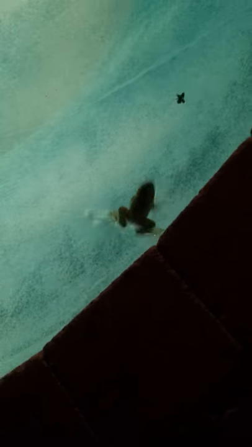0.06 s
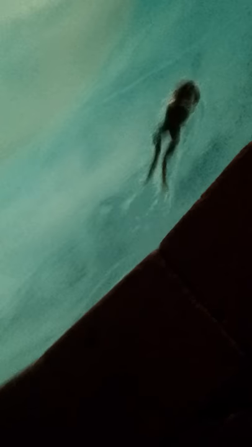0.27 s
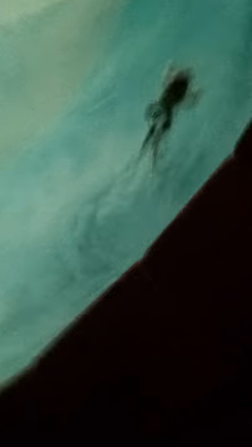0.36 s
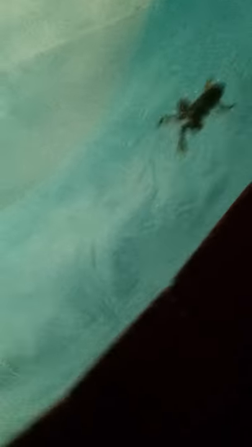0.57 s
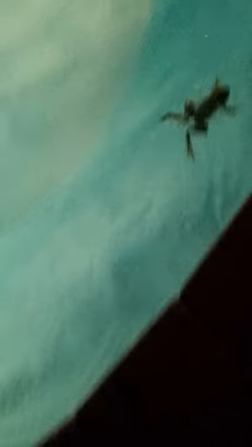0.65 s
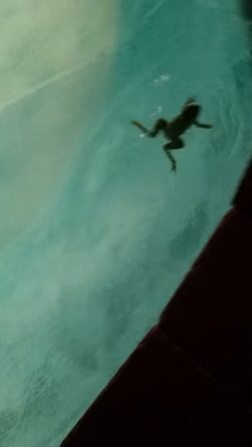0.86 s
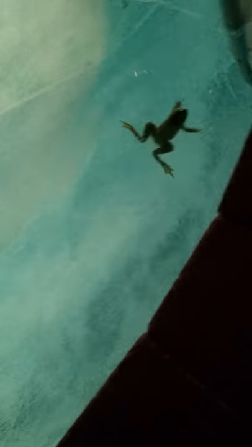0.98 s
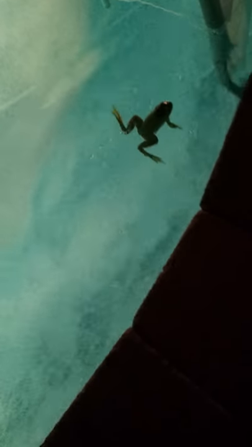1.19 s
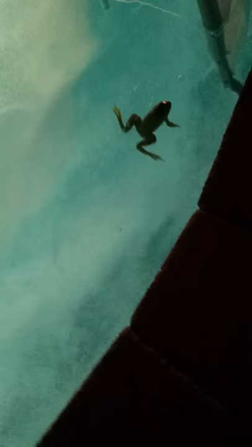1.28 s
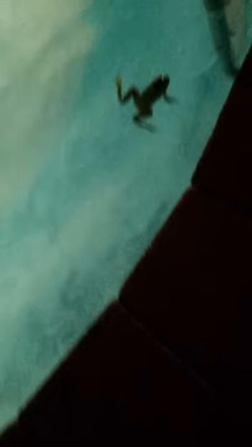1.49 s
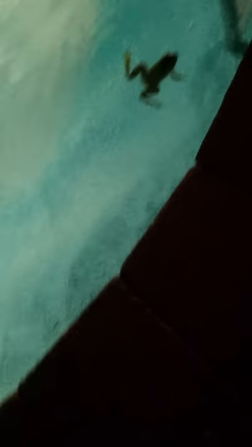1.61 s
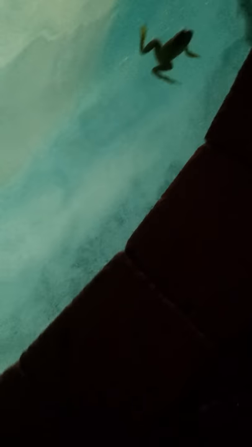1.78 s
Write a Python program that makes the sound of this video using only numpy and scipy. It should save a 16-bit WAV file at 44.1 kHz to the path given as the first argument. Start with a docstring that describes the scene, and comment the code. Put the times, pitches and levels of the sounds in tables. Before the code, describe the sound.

A frog makes one short, close splash in a backyard pool, from about 0.2 to 0.5 seconds. Spray patters and small bubbles ring upward in pitch, with a lower plop near 0.4 seconds and a few last drips. A quiet night hiss runs throughout. A faint distant drone grows after 1 second, and a very faint metallic tink comes near 1.5 seconds.

```python
"""A frog's splash at night

A frog kicks off across a backyard pool and makes one short splash, close by.
Trapped air bubbles ring and rise in pitch amid a patter of spray; one big bubble plops as the
water closes. Behind it are a quiet hiss, a fading hum, a distant low drone that grows,
a few faint swishes and one faint metallic tink."""
import sys
import numpy as np
from scipy import signal
from scipy.fft import rfft, irfft
from scipy.io import wavfile

SR = 44100
rng = np.random.default_rng(int(sys.argv[2]) if len(sys.argv) > 2 else 0)


def dump(signal):
    """Clip the signal to [-1, 1] and save it as 16-bit WAV at the path in sys.argv[1]."""
    limited = np.clip(np.atleast_2d(signal).T, -1, 1)
    pcm = np.round(limited * 32767).astype(np.int16)
    wavfile.write(sys.argv[1], SR, pcm)


N = 81585
T = np.arange(N) / SR
HZ = np.fft.rfftfreq(N, 1 / SR)

# Tone colour of the hiss: pitch_hz, level_db
HISS_COLOUR = [(20, -7), (50, -8.5), (92, 1.5), (120, -6.5), (160, -3), (210, 0), (260, 0), (310, -3),
               (380, -6.5), (600, -8.5), (1000, -12), (2200, -15), (2900, -17), (3600, -17), (4500, -15),
               (5150, -10), (5550, -13), (6100, -17.5), (11500, -19.5)]
# Loudness of the hum: time_s, level_db
HUM_LEVEL = [(0, -69), (.15, -66), (.6, -67), (1, -70), (1.85, -78.5)]
# Tone colour of the drone's noise: pitch_hz, level_db
DRONE_COLOUR = [(120, -28), (230, 3), (400, 1.5), (600, -1.5), (1000, -10.5), (2500, -12), (5000, -22.5)]
# Loudness of the drone: time_s, level_db
DRONE_LEVEL = [(0, -72), (.95, -70), (1.15, -60.5), (1.27, -59.5), (1.335, -55.5), (1.39, -60), (1.56, -60),
               (1.65, -56), (1.73, -59.5), (1.81, -56.5), (1.85, -59)]
# Faint swishes: peak_s, width_s, level_db, pitch_hz, width_hz
SWISHES = [(.083, 0.017, -54.5, 10000, 613), (.085, 0.021, -60.5, 7900, 2540),
           (.988, 0.012, -58.5, 9600, 2300), (1.008, 0.014, -61, 2000, 2500),
           (1.667, 0.022, -62.5, 1500, 1400)]
# How much water is thrown about: time_s, level_db
SPLASH_LEVEL = [(.1, -110), (.16, -60), (.195, -52), (.212, -39), (.222, -41), (.236, -35.5), (.257, -41.5),
                (.270, -45), (.276, -38), (.283, -41), (.292, -32.5), (.312, -45), (.331, -39.5),
                (.350, -43.5), (.366, -48.5), (.381, -44.5), (.392, -34.5), (.414, -48), (.432, -55.5),
                (.48, -57), (.53, -62), (.62, -120)]
# Tone colour of the droplets: pitch_hz, level_db
DROP_COLOUR = [(250, -24), (850, -23), (1250, -1), (2400, 4), (3800, 1.5), (5600, 1.5), (7500, -4.5),
               (10000, -7), (12000, -18)]
# Tone colour of the finest spray: pitch_hz, level_db
MIST_COLOUR = [(2500, -15), (5000, -4), (7500, 2), (10000, 1), (12000, -5)]
# Single air bubbles (ring_s is the time to fade by 60 dB):
# start_s, pitch_hz, level_db, ring_s, rise_octaves_per_s, snap_0_to_1
BUBBLES = [ (.1688, 2700, -49.5, 0.028, 80, .1), (0.195, 5100, -44, .018, 5, .1),
           (0.2076, 4000, -30, .005, 20, .1), (0.2131, 4530, -28, .004, 20, 0.56),
           (0.2132, 1320, -34, 0.013, 13, 0.2), (.2280, 2340, -25, 0.008, 10, 0.1),
           (0.2277, 1346, -29.5, 0.036, 11, 0.3), (.2291, 3870, -24.5, 0.0095, 20, 0),
           (.2382, 7330, -30, 0.013, 10, 0.1), (.2473, 6400, -36, .008, 10, .2),
           (0.2632, 7100, -27.5, 0.0074, 5, 0.6), (0.277, 4000, -30, 0.0049, 20, 1),
           (0.2805, 3140, -34, 0.032, 29, 0.2), (.2870, 3630, -27, 0.0026, 20, 0),
           (0.2906, 5550, -24, 0.0037, 20, 0.55), (0.3019, 3810, -21, 0.0082, 35, .03),
           (0.3119, 2300, -35.5, 0.024, 45, .1), (0.3232, 3805, -24, 0.015, 20, 0),
           (.3365, 590, -40.5, 0.12, 7.75, 0), (.3368, 958, -39, 0.074, 10, .1),
           (0.343, 5950, -31.5, 0.011, 13, .8), (.3450, 1100, -36.5, 0.021, 22, 0),
           (0.3473, 3680, -20, 0.018, 25, 0), (0.3507, 4230, -14.5, 0.0058, 12, 0),
           (0.3533, 3850, -23.5, 0.0083, 16, 0.05), (0.3715, 7800, -35, .006, 10, 0),
           (0.3738, 2200, -27.5, .013, 3, 0.17), (0.38, 7500, -34, 0.011, 15, .1),
           (.3870, 1980, -34, 0.027, 11, 0.8), (0.3861, 486.4, -31, 0.099, 9.5, 0.7),
           (.3870, 340, -40.5, 0.018, 11, 0), (0.3976, 5050, -27.5, 0.0033, 20, 0.8),
           (.4070, 5500, -31, 0.0078, 60, 0), (0.436, 5400, -40, 0.019, 5, .1),
           (.4451, 1920, -29, 0.0038, 10, 0.33), (0.453, 1610, -38.5, 0.059, 57, 0.1),
           (0.4679, 1080, -48.5, 0.069, 4.3, .05), (0.49, 998, -43.5, 0.038, 15, .05),
           (.5015, 2030, -46, .045, 55, 0.1), (0.5096, 6750, -28.5, 0.0019, 47, 0.16),
           (0.5371, 3030, -36.5, 0.014, 4.2, 1), (0.6342, 3940, -46.5, 0.0068, 10, .1),
           (0.7722, 10000, -47, 0.0093, 5, 0.2), (1.2238, 3600, -43, 0.0026, 10, .3)]
# Tone colour of the churned water: pitch_hz, level_db
GURGLE_COLOUR = [(120, -10), (280, -4.5), (550, -0.5), (1050, -1), (1600, -11), (3000, -23)]
# Loudness of the churned water: time_s, level_db
GURGLE_LEVEL = [(.2, -110), (.262, -64), (.277, -51), (.31, -54), (.345, -52), (.39, -50.5), (.42, -62),
                (.5, -68), (.62, -120)]
# The notes that ring in the metal: pitch_hz, relative_level_db, ring_s
METAL_NOTES = [(1757, -2, 0.28), (1820, -3, 0.042), (1373, -9, 0.19), (1596, -1, .06), (715, -4, 0.14),
               (593, -6, 0.063)]


def amp(db):
    """Turns decibels into a number to multiply by."""
    return 10 ** (np.asarray(db) / 20)


def unit(x):
    """Scales a sound to an average strength (rms) of 1."""
    return x / np.sqrt(np.mean(x ** 2) + 1e-20)


def level(points):
    """A loudness curve through (time_s, level_db) points."""
    return amp(np.interp(T, *np.transpose(points)))


def swell(peak_s, width_s):
    """A smooth rise and fall."""
    return np.exp(-.5 * ((T - peak_s) / width_s) ** 2)


def colour(x, points):
    """Shapes the lows and highs of a sound, at strength 1."""
    hz, db = np.transpose(points)
    gain = amp(np.interp(np.log(HZ + 1), np.log(hz), db))
    return unit(irfft(rfft(x) * gain, N))


def band(hz, width_hz):
    """Noise around one pitch; around 0 Hz it is a random wobble."""
    gain = np.exp(-.5 * ((HZ - hz) / width_hz) ** 2)
    return unit(irfft(rfft(rng.standard_normal(N)) * gain, N))


def add(mix, start_s, sound):
    """Mixes a sound in at its start time."""
    part = mix[max(round(start_s * SR), 0):][:len(sound)]
    part += sound[:len(part)]


def tone(hz, waver_hz, flutter):
    """A tone of unsteady pitch and strength."""
    cycles = np.cumsum(hz + waver_hz * band(0, 11)) / SR
    return unit((1 + flutter * band(0, 11)) * np.sin(2 * np.pi * cycles))


def hiss():
    """The quiet, steady hiss of the night."""
    return amp(-55.5) * colour(rng.standard_normal(N), HISS_COLOUR)


def hum():
    """A low hum that fades."""
    return level(HUM_LEVEL) * tone(hz=151, waver_hz=2.96, flutter=.14)


def drone():
    """A distant rumble and a wavering tone grow together."""
    rumble = colour(rng.standard_normal(N), DRONE_COLOUR)
    note = tone(hz=313, waver_hz=14.55, flutter=.67)
    return level(DRONE_LEVEL) * amp(-3) * (rumble + note)


def swishes():
    """Faint puffs of noise come and go."""
    return sum(amp(db) * swell(peak_s, width_s) * band(hz, width_hz)
               for peak_s, width_s, db, hz, width_hz in SWISHES)


def ring(hz, ring_s, octaves_per_s):
    """An air bubble swells, then fades while its pitch climbs, until it surfaces."""
    t = np.arange(0, 1.4 * ring_s, 1 / SR)
    cycles = np.cumsum(np.minimum(hz * 2 ** (octaves_per_s * t), SR / 2)) / SR
    peak_s, pop_s = 1.1 / hz, .0022
    surface_s = .43 / octaves_per_s  # it pops after climbing .43 octaves
    onset = np.sin(np.pi / 2 * np.minimum(t / peak_s, 1))
    fade = amp(-60 * np.maximum(t - peak_s, 0) / ring_s)
    cut_off = np.exp(-np.maximum(t - surface_s, 0) / pop_s)
    return onset * fade * cut_off * np.sin(2 * np.pi * cycles)


def patter(low_hz, high_hz, density, sizes=30):
    """A random shower of tiny bubbles; the smaller, higher ones come more often."""
    out = np.zeros(N)
    for hz in np.geomspace(low_hz, high_hz, sizes):
        per_s = density / sizes * np.sqrt(hz / 2000)
        strength = amp(3.5 * np.minimum(rng.exponential(1, N), 3.5))
        hits = strength * (rng.random(N) < per_s / SR) * rng.choice([-1, 1], N)
        fade_s = 1.97 / hz  # falls to about a third in two cycles
        bubble = ring(hz, ring_s=np.log(1000) * fade_s, octaves_per_s=.06 / fade_s)
        out += np.sqrt(hz) * unit(signal.oaconvolve(hits, bubble)[:N])
    return out


def spray():
    """The kick throws up hundreds of droplets and a fine mist."""
    drops = colour(patter(982, 12170, density=3800), DROP_COLOUR)
    mist = colour(patter(3100, 11500, density=3800), MIST_COLOUR)
    return amp(-2) * level(SPLASH_LEVEL) * drops + amp(-55) * swell(peak_s=.24, width_s=.059) * mist


def bubbles(click_hz=5540, fizz_s=.0012, fizz_above_hz=3500):
    """Trapped air pinches off with a click and a trace of bright fizz, then rings."""
    out, t = np.zeros(N), T[:256]
    click = np.sin(2 * np.pi * click_hz * t) * (t * click_hz < 1)  # one cycle
    bright = signal.butter(2, fizz_above_hz, "high", fs=SR)
    for start_s, hz, db, ring_s, octaves_per_s, snap in BUBBLES:
        fizz = .6 * np.exp(-t / fizz_s) * signal.lfilter(*bright, rng.standard_normal(len(t)))
        add(out, start_s, amp(db) * ring(hz, ring_s, octaves_per_s))
        add(out, start_s, amp(db + 1.5) * snap * (click + fizz))
    return out


def gurgle():
    """Low bubbles churn in the water behind the legs."""
    return level(GURGLE_LEVEL) * colour(patter(249, 1560, density=2500), GURGLE_COLOUR)


def heave():
    """The heaving surface gives a soft, very low puff."""
    return amp(-63.5) * swell(peak_s=.33, width_s=.05) * band(hz=30, width_hz=15)


def tink(start_s=1.453, rise_s=.0028):
    """Something small and metallic is touched once and rings."""
    out = np.zeros(N)
    notes = sum(amp(db - 60 * T / ring_s) * np.sin(2 * np.pi * hz * T) for hz, db, ring_s in METAL_NOTES)
    add(out, start_s, amp(-49.5) * notes * np.minimum(T / rise_s, 1))
    return out


def yard(x, ring_s=.3, rise_s=.0013):
    """Adds the faint echo of the open yard."""
    fade = amp(-60 * T / ring_s) * np.minimum(T / rise_s, 1)
    echo = unit(rng.standard_normal(N) * fade) / np.sqrt(N)
    return x + amp(-20) * signal.fftconvolve(x, echo)[:N]


def scene():
    """All the sounds together, the same on the left and right."""
    night = hiss() + hum() + drone() + swishes()
    splash = bubbles() + spray() + gurgle()
    mono = night + yard(splash + tink()) + heave()
    return np.array([mono, mono])


def record(dry):
    """Cuts away the treble above 11900 Hz."""
    treble_cut = signal.firwin(401, 11900, window=("kaiser", 8), fs=SR)
    return signal.oaconvolve(dry, treble_cut[None], "same")


dry = scene()
out = record(dry)
dump(out)
```